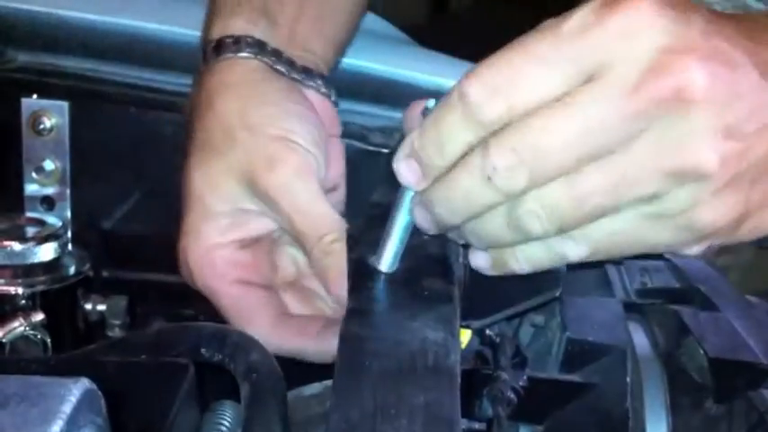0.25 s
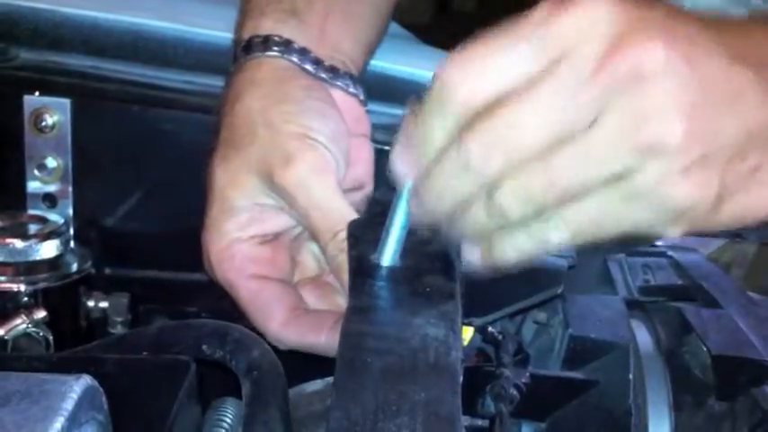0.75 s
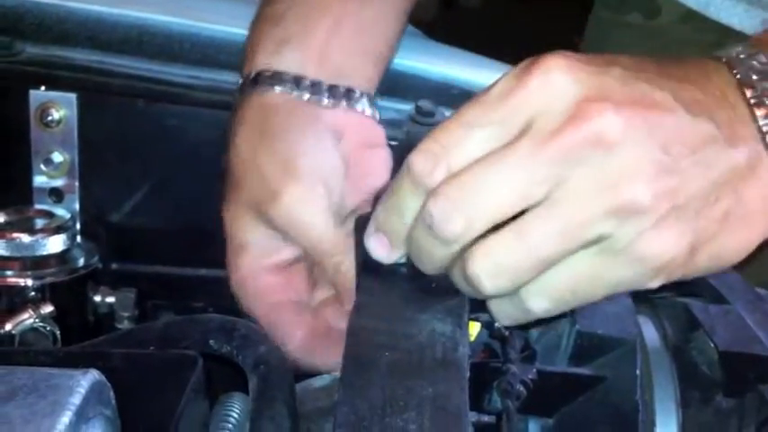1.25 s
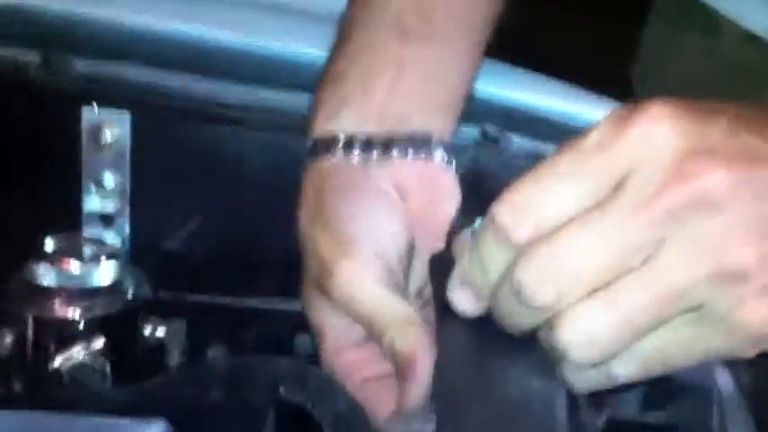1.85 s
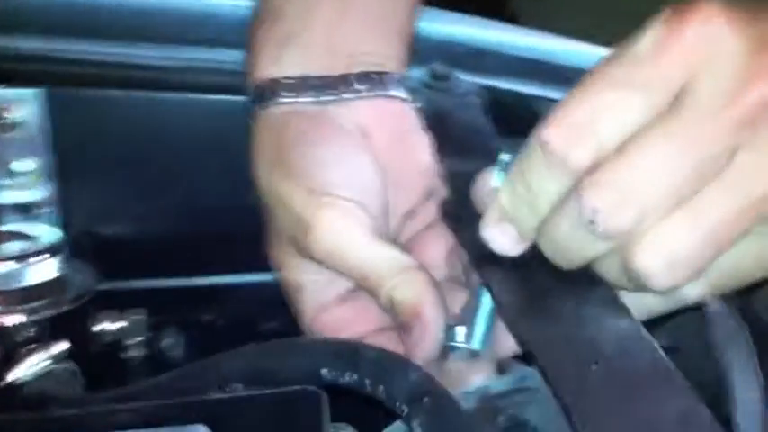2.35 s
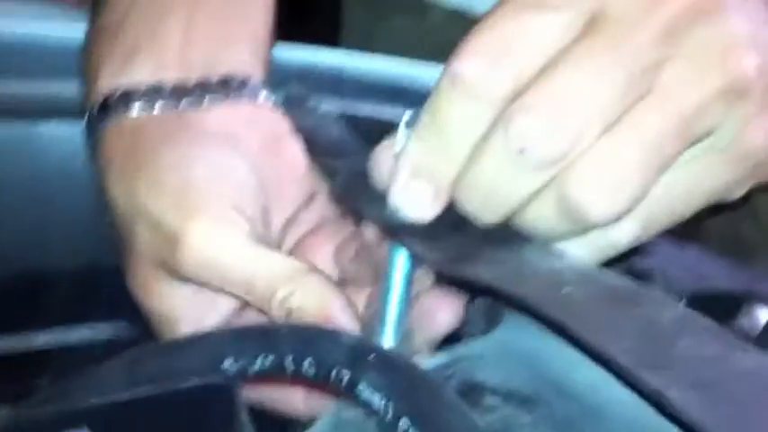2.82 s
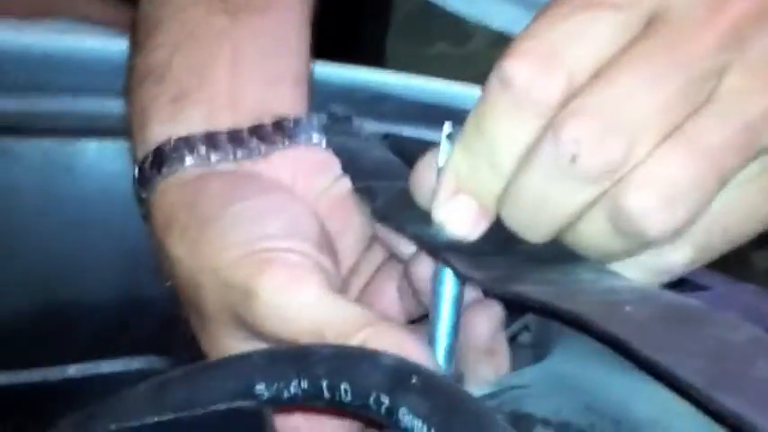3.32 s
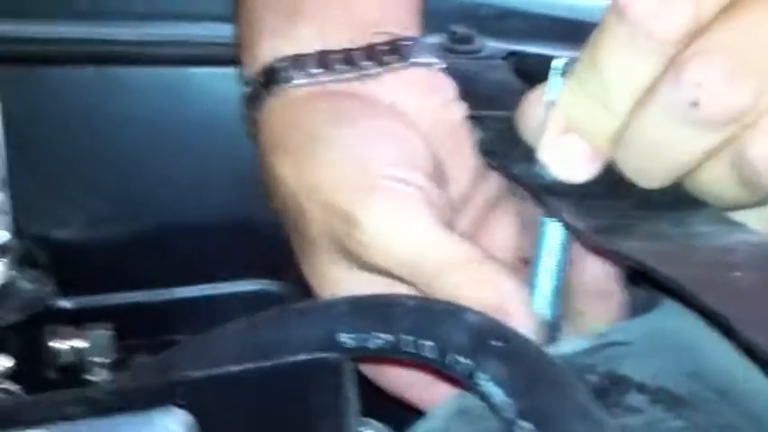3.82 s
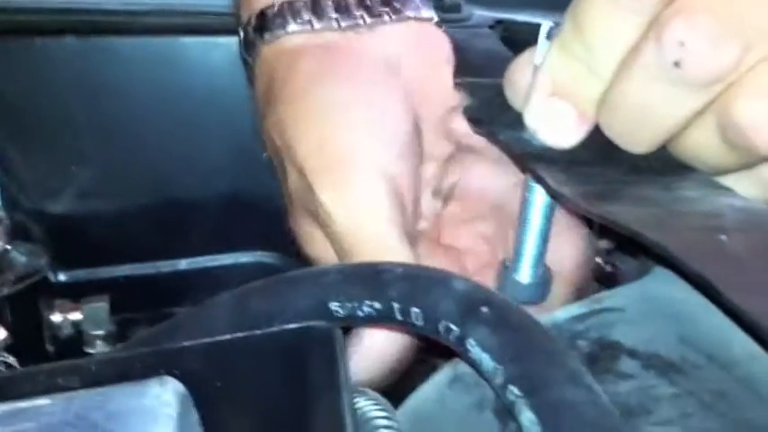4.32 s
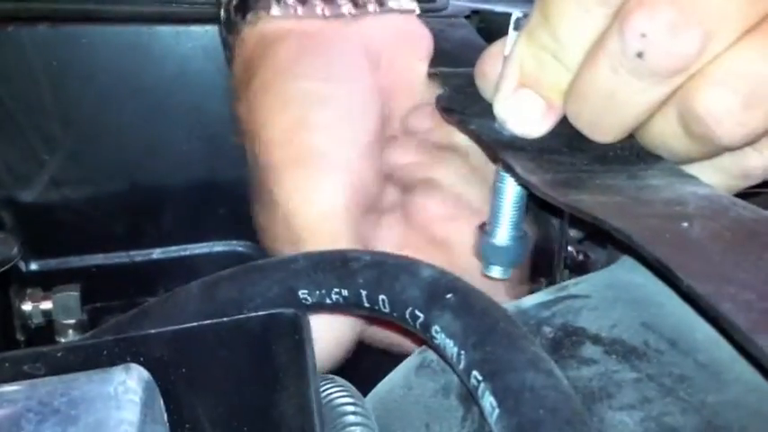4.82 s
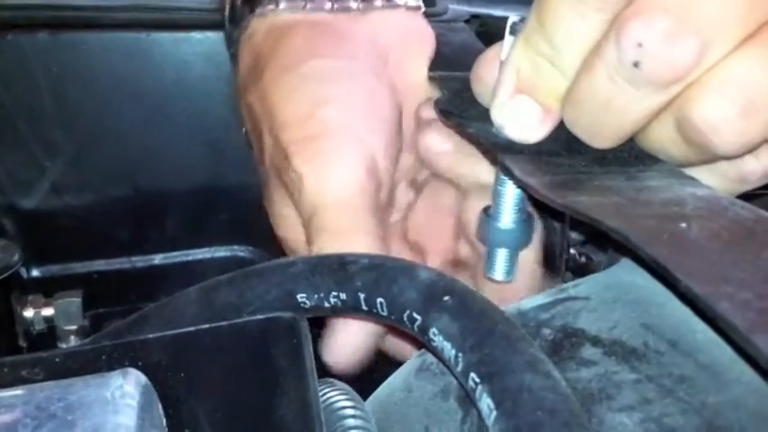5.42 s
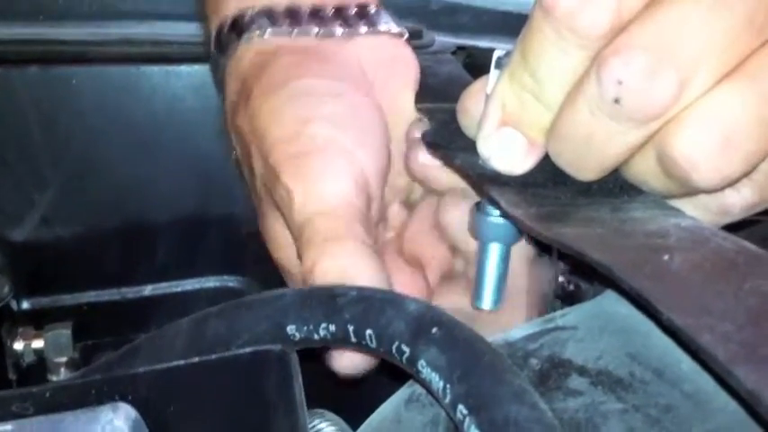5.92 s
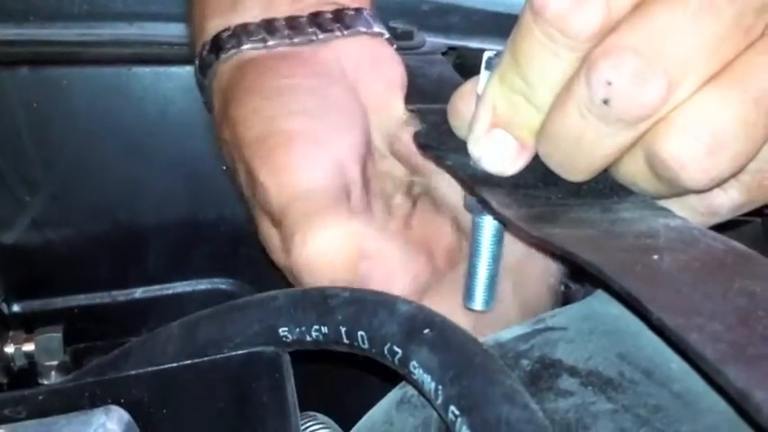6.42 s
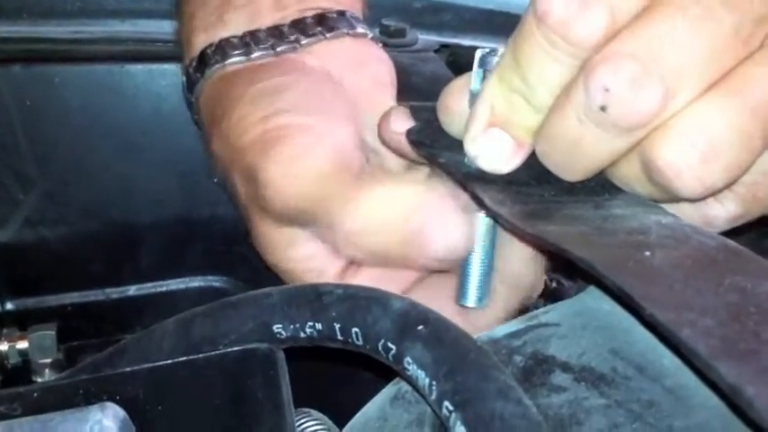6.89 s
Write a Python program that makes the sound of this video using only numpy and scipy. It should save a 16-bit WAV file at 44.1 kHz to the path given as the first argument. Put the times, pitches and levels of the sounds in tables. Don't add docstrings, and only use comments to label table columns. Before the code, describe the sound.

Very close outdoors, a bolt knocks hard into a hole in a steel strap and its thread rasps over the edge in quick gritty ticks. Small taps and rubs follow with quiet gaps, then fingers flick a nut up the thread in a steady series of bright rattling clicks that ring lightly. The engine bay adds short dull scatter; soft air bumps and distant traffic lie beneath.

```python
import sys
import numpy as np
from scipy import signal
from scipy.fft import rfft, irfft
from scipy.io import wavfile
from scipy.ndimage import uniform_filter1d, minimum_filter1d

SR = 44100
rng = np.random.default_rng(int(sys.argv[2]) if len(sys.argv) > 2 else 0)


def store_wav(level_fs):
    pcm = np.round(np.clip(np.atleast_2d(level_fs), -1, 1) * 32767)
    wavfile.write(sys.argv[1], SR, pcm.T.astype(np.int16))


def invert_db(x):
    u = np.asarray(x, float) / 20
    return 10 ** u


N = 315315

SPLITS_HZ = (2000, 7000)



def bolt_in_strap():
    # t/s, peak level/dB, hardness/dB, chatter t60/s, ring f/Hz
    touches = [(0.2815, -54.5, -28, 0.038, 800), (0.5493, -18, -4.5, 0.058, 3400),
               (0.8574, -2, 16, 0.031, 4300), (0.9484, -8.5, 7.5, 0.057, 3030),
               (1.4216, -36, -7, 0.054, 1870), (1.4797, -34, 21, 0.025, 1110),
               (1.531, -42.5, -11.5, 0.033, 2210), (1.574, -47, 15, 0.1, 5000),
               (1.5872, -40.5, 7, 0.1, 5350), (1.6116, -27, 0.5, 0.084, 4380),
               (2.0187, -44, -8, 0.036, 1010), (2.0552, -38, -9, 0.025, 750),
               (2.4137, -51, -15.5, 0.046, 1570), (2.6635, -41.5, -5, 0.063, 1130),
               (3.1293, -38, -0.5, 0.051, 1130), (3.4997, -26, 15, 0.034, 4100),
               (3.5414, -54, 39.5, 0.029, 929)]
    # t/s, peak level/dB, hardness/dB, chatter t60/s, ring f/Hz
    drags = [(0.9015, -6.5, 13, 0.047, 5050), (0.9098, 3.5, 13, 0.021, 2850),
             (0.9364, -24, 18, 0.026, 2700), (0.9565, -6, 14, 0.026, 2840), (1.0625, -56, 3, 0.039, 1200),
             (1.1089, -24.5, -7, 0.053, 1290), (1.1333, 4.5, 22, 0.012, 4560),
             (1.1677, -27, 33, 0.023, 902), (1.1897, -29, 4, 0.075, 2770), (1.2106, -2.5, 7, 0.026, 1200),
             (1.2521, -11.5, 1.5, 0.024, 870), (1.7699, -44, 11, 0.07, 931),
             (1.9085, -29.5, -8, 0.041, 5100), (1.9494, -43, 29, 0.041, 4870), (2.216, -38, 2, 0.082, 6300),
             (2.2494, -36, 25, 0.052, 6300), (2.3494, -48, 20, 0.064, 902), (2.578, -33, 22.5, 0.031, 8000),
             (3.3618, -39, -1, 0.038, 1930), (3.7858, -45, 0, 0.12, 2010)]
    # t of hardest push/s, level/dB, rise of 20 dB/s, fall of 20 dB/s, hardness/dB
    rasp = [
        (0.864, -17, 0.003, 0.04, 15),
        (0.945, -27, 0.3, 0.14, -11),
        (1.115, -31, 0.1, 0.3, -3),
        (1.24, -43, 0.1, 0.08, -13),
        (2.232, -38, 0.055, 0.06, 7),
        (2.58, -41, 0.11, 0.035, 6),
        (3.495, -40, 0.07, 0.025, 20),
        (3.75, -51, 0.04, 0.3, 10),
    ]
    # f/Hz, width/Hz, level above the body colour/dB
    strap_modes = [(904, 60, 7), (1210, 90, 3), (1530, 50, 5), (2240, 30, 4), (2620, 30, 5), (2790, 45, 9),
                   (3310, 110, 6), (3660, 130, 4), (4190, 30, 0), (4600, 70, 3), (5080, 40, 1),
                   (5290, 130, 2), (5850, 40, 5), (6670, 160, 5), (8930, 60, 4), (12700, 220, 4)]
    # f/Hz, level/dB
    strap_body = [(150, -20.5), (250, 2), (816, 4), (906, 6), (1850, 5), (2710, 9), (3120, 7), (5160, 12.5),
                  (7440, -7.5), (14400, 0.5), (16000, -33)]

    knock, knock_ring = chatter(touches, (-0.26, 1.1741, -17.5, 0.88),
                                crest_db=8.0, rise_s=0.0012, ring_db=-1.0, width_hz=260)
    drag, drag_ring = chatter(drags, (-0.5, 1.02, -20.5, 0.9058),
                              crest_db=5.0, rise_s=0.0086, ring_db=9.5, width_hz=490)
    slide = sliding(rasp, (-1.05, 0.3, -15.5, 1.2638), (0.17, 0.81), catch_db=2.0, catch_hz=61.3)
    force = knock + drag + slide * invert_db(-8.5)
    strap = metal(force, strap_modes, strap_body, per_s=6000, spread_db=1.5, wander_db=2.5)
    return knock_ring + drag_ring + strap


def nut_on_thread():
    # t/s, peak level/dB, hardness/dB, chatter t60/s, ring f/Hz
    knocks = [(4.0166, -24, 11.5, 0.054, 5070), (4.1235, -38, -14.5, 0.064, 2027),
              (4.1569, -28, 5.5, 0.15, 5620), (4.3934, -18.5, 6, 0.019, 2300), (4.642, -20, 7, 0.029, 6600),
              (4.6564, -28, -24, 0.02, 1080), (4.8889, -31, 15.5, 0.09, 1060),
              (5.1185, -18, 13, 0.025, 1480), (5.157, -43, 16, 0.017, 1360), (5.3315, -23, 7, 0.035, 5000),
              (5.3524, -27.5, -11.5, 0.045, 1110), (5.3865, -27.5, 9.5, 0.15, 3800),
              (5.5897, -23.5, 5, 0.033, 5730), (5.8287, -21, 7, 0.014, 5650),
              (5.8475, -35.5, -1.5, 0.15, 1070), (6.0887, -14.5, 4, 0.016, 6770),
              (6.119, -28.5, 15, 0.074, 5120), (6.3051, -25, 3.32, 0.021, 1950),
              (6.6747, -41.5, -3, 0.074, 2170), (6.799, -47.5, 14, 0.057, 9000)]
    # t/s, peak level/dB, hardness/dB, chatter t60/s, ring f/Hz
    wobbles = [(4.143, -25.5, 5, 0.045, 5340), (4.4152, -23.5, 0.5, 0.051, 4080),
               (4.434, -22, 6, 0.037, 5530), (4.5555, -33, -3, 0.055, 1610), (4.6164, -35, 11, 0.043, 4000),
               (4.6822, -15.5, 4, 0.028, 4240), (4.907, -25, -4, 0.083, 2560), (5.4251, -33, 1, 0.17, 2610),
               (5.5164, -41, 2, 0.34, 1330), (5.6186, -22.5, 5.5, 0.12, 1670),
               (5.7663, -43, 15, 0.03, 1950), (5.916, -26.5, 7.5, 0.093, 4070),
               (6.0541, -45, 17.5, 0.0145, 1900), (6.1404, -14, 4, 0.022, 2070),
               (6.2114, -18, 1, 0.025, 1960), (6.2484, -49, 2, 0.024, 1960), (6.336, -22.5, 5, 0.062, 6730),
               (6.385, -13, 8.5, 0.018, 5170), (6.99, -54, 12, 0.29, 1690)]
    # t of the flick/s, level/dB, rise of 20 dB/s, fall of 20 dB/s, hardness/dB
    spin = [(4.15, -47, 0.02, 0.55, 8), (4.4, -41.5, 0.003, 0.36, 12), (4.655, -35, 0.004, 0.43, 11),
            (4.91, -42.5, 0.012, 0.155, 8), (5.128, -37, 0.004, 0.15, 3), (5.39, -41.5, 0.08, 1.5, -2),
            (5.603, -39, 0.004, 0.6, -4), (5.849, -38.5, 0.003, 0.9, 4), (6.119, -33, 0.003, 0.4, 1),
            (6.384, -33, 0.09, 0.022, 3), (6.85, -61, 0.8, 1.2, 14), (7.026, -54, 0.15, 0.21, 4)]
    # f/Hz, width/Hz, level above the body colour/dB
    nut_modes = [(760, 50, -2), (1060, 45, 2), (1400, 50, 3), (1670, 55, 5), (1960, 90, 3), (2260, 30, 4),
                 (2650, 50, 5), (3380, 50, 5), (4020, 120, 7), (4960, 60, 7), (5350, 80, 6), (6020, 50, 3),
                 (6770, 90, 8), (7830, 50, 4), (9160, 300, 4), (11900, 70, 5)]
    # f/Hz, level/dB
    nut_body = [(90, -37), (290, -4.5), (500, -10.5), (800, 3.5), (1510, 3), (1980, 4), (2890, 1),
                (3980, -1), (4660, 1), (6900, -4), (7530, -4.5), (16000, -12.5)]
    # t/s, ring level/dB
    freeing = [
        (4.0, -2),
        (5.3, 0),
        (5.7, 3),
        (6.4, 4),
        (6.5, -3),
    ]

    knock, knock_ring = chatter(knocks, (1.1, 0.7472, -12, 1.03),
                                crest_db=9.0, rise_s=0.0018, ring_db=0.5, width_hz=240)
    wobble, wobble_ring = chatter(wobbles, (-3, 1, -14, 1.31),
                                  crest_db=8.5, rise_s=0.004, ring_db=3.0, width_hz=240)
    slide = sliding(spin, (-2.5, 0.15, -27, 2.02), (0.24, 0.7), catch_db=2.5, catch_hz=60.5)
    force = (knock + wobble + slide * invert_db(-7.0)) * hanging()
    free_db = np.interp(np.arange(N) / SR, *np.transpose(freeing))
    nut = metal(force, nut_modes, nut_body, per_s=4500, spread_db=3.5, wander_db=2.0, free_db=free_db)
    return knock_ring + wobble_ring + nut


def hanging():
    # t/s, level lost/dB
    stalls = [
        (5.585, 0),
        (5.822, -1),
        (5.843, 7),
        (6.11, 0.5),
        (6.296, 9),
        (6.33, -1),
    ]
    stall_s = 0.0095
    t = np.arange(N) / SR
    return invert_db(-sum(db * np.exp(-((t - s) / stall_s) ** 2) for s, db in stalls))


def ringing_spots():
    # t/s, peak level/dB, ring f/Hz, t60/s
    bolt_rings = [(0.550, -18, 5050, 0.045), (0.556, -29, 3050, 0.088), (0.552, -14.5, 1170, 0.064),
                  (0.283, -36, 1200, 0.053), (0.907, -26.5, 2720, 0.036), (0.938, -9.5, 3680, 0.043),
                  (0.959, -24, 2747, 0.029), (0.959, -5.5, 4660, 0.032), (0.912, -16, 1070, 0.18),
                  (0.99, -22.5, 1050, 0.22), (1.120, -21, 3140, 0.05), (1.204, -16, 1110, 0.09),
                  (1.423, -31, 1530, 0.069), (1.423, -49, 3470, 0.055), (1.588, -32, 5080, 0.059),
                  (1.613, -31, 4160, 0.085), (1.62, -25.5, 1700, 0.08), (1.66, -46, 4900, .08),
                  (1.908, -40, 5240, 0.14), (1.915, -45, 9100, .04), (2.415, -58, 1550, .08),
                  (2.58, -46, 1590, 0.099), (3.13, -38.5, 1120, 0.1), (3.49, -32.5, 1700, 0.095)]
    # t/s, peak level/dB, ring f/Hz, t60/s
    nut_rings = [(4.017, -28.5, 5150, 0.096), (4.017, -35, 1810, 0.069), (4.25, -47, 1970, 0.73),
                 (4.69, -34, 6200, 0.36), (4.75, -41, 1930, 0.44), (4.80, -40.5, 6610, 0.18),
                 (5.119, -27, 1930, 0.044), (5.119, -29, 5350, .06), (5.119, -27, 11800, 0.078),
                 (5.185, -42, 1810, 0.215), (5.592, -36.5, 5630, .05), (5.617, -33, 1950, 0.17),
                 (5.828, -31, 5630, 0.029), (5.895, -34, 1950, 0.37), (5.918, -43, 4100, 0.041),
                 (5.93, -38, 2330, 0.24), (6.12, -33, 6800, .2), (6.12, -38, 5070, .15),
                 (6.2, -39, 6860, 0.235), (6.155, -40, 2010, 0.6), (6.31, -35.5, 1990, 0.26),
                 (6.338, -38, 6600, 0.17), (6.384, -26, 4000, 0.045), (6.678, -56, 2120, 0.077),
                 (6.817, -42.5, 5350, 0.067), (6.848, -41, 1710, 0.075), (6.958, -37.5, 1570, 0.059),
                 (6.99, -45, 5200, 0.052), (7.015, -41, 2100, 0.13), (7.052, -42, 1780, 0.3)]
    # t/s, peak level/dB, centre f/Hz, t60/s
    rubs = [(0.549, -16.5, 5200, 0.061), (0.57, -46, 3180, 0.15), (0.985, -26.5, 4170, 0.17),
            (1.11, -47, 7400, 0.086), (1.21, -27, 7500, 0.049), (3.26, -47, 4000, .08),
            (3.362, -46, 3500, 0.088), (3.47, -36, 2420, 0.18), (5.387, -21, 4500, 0.065),
            (5.591, -26, 5500, 0.043), (5.607, -36, 2500, .15), (0.937, -4, 4200, .04),
            (1.087, -36, 3020, 0.12), (1.422, -35.5, 2630, 0.079), (1.586, -39, 5200, .06),
            (1.77, -47, 5000, 0.086), (2.02, -41, 2500, 0.064), (0.787, -46, 12000, .02),
            (2.345, -51, 6030, 0.14), (2.414, -41.5, 2200, .1), (2.525, -48, 4600, 0.22),
            (2.555, -43.5, 2200, 0.26), (2.665, -52, 3500, .08), (3.13, -45, 2780, 0.092),
            (4.50, -53, 5000, .1), (5.20, -49, 5000, .05), (5.687, -46.5, 6000, .06),
            (5.848, -36, 1200, 0.16), (6.306, -44, 3200, 0.042), (6.815, -39, 1800, .04),
            (6.845, -48, 2400, 0.1), (6.95, -49, 4550, 0.12), (6.99, -47, 1770, 0.5),
            (7.05, -54, 2000, 0.24), (7.06, -44.5, 5500, 0.13)]
    # t/s, peak level/dB, ring f/Hz, t60/s
    hums = [(0.93, -46, 380, 0.29), (1.02, -26.5, 373, 0.19), (1.11, -36, 380, 0.44), (1.2, -28, 370, 0.19),
            (1.3, -40.5, 356, 0.47), (2.04, -38, 660, 0.069), (2.425, -38, 248, 0.14),
            (2.47, -30.5, 434, 0.11), (4.42, -42, 342, 0.2), (4.76, -39, 385, 0.3), (5.6, -41, 330, .2)]

    rings = free_rings(bolt_rings, width_hz=240, rise_s=0.00028)
    rings += free_rings(nut_rings, width_hz=560, rise_s=0.0012)
    rings += free_rings(rubs, width_hz=2900, rise_s=0.0028)
    rings += free_rings(hums, width_hz=120, rise_s=0.0042)
    return crest_ticks() + rings + snaps()


def crest_ticks():
    # t/s, peak level/dB, ring t60/s
    ticks = [(0.8527, -27, 0.03), (0.9894, -33, 0.03), (1.0034, -35, 0.03), (1.0141, -32, 0.03),
             (1.0274, -40, 0.03), (1.036, -37, 0.03), (1.063, -52, 0.027), (1.0839, -43, 0.03),
             (1.0954, -42, 0.025), (1.1094, -22, 0.027), (1.1214, -23, 0.021), (1.1343, -13.5, 0.027),
             (1.1707, -28.5, 0.026), (1.2036, -19, 0.031), (1.2133, -21, 0.025), (1.2234, -27, 0.03),
             (1.2454, -39, 0.03), (1.2521, -25, 0.025), (1.7699, -57, 0.03), (1.7838, -47, 0.03)]
    mode_hz, spread, level_db = 5200, 0.025, -1.0
    out, t = np.zeros(N + SR), np.arange(SR // 20) / SR
    for s, peak_db, t60 in ticks:
        hz = mode_hz * (1 + spread * rng.standard_normal())
        envelope = (1 - np.exp(-t / 0.00094)) * invert_db(peak_db + level_db - 60 * t / t60)
        out[round(s * SR):][:len(t)] += np.sin(2 * np.pi * hz * t) * envelope
    return out[:N]


def snaps():
    # t/s, peak level/dB
    cracks = [(1.422, -27), (1.533, -34), (1.612, -17), (2.414, -43), (2.664, -39), (3.131, -40),
              (4.02, -30), (4.642, -22), (4.657, -24), (4.891, -30), (5.12, -16), (5.332, -18),
              (5.592, -22), (5.691, -32), (5.767, -26), (5.848, -20), (5.918, -20), (6.117, -20),
              (6.253, -31), (6.307, -29), (6.675, -29), (7.016, -34)]
    level_db, centre_hz, t60_s = -10.5, 2300, 0.024
    rows = [(s, db + level_db, centre_hz, t60_s) for s, db in cracks]
    return free_rings(rows, width_hz=3200, rise_s=0.00018)


def free_rings(rows, width_hz, rise_s):
    out, t = np.zeros(N + SR), np.arange(SR // 4) / SR
    for s, peak_db, hz, t60 in rows:
        rub = resonance(rng.standard_normal(len(t)), hz, width_hz)
        rub = rms_one(resonance(rub, hz, width_hz))
        envelope = (1 - np.exp(-t / rise_s)) * invert_db(peak_db - 6 - 60 * t / t60)
        out[round(s * SR):][:len(t)] += rub * envelope
    return out[:N]


def chatter(events, law, crest_db, rise_s, ring_db, width_hz):
    force, rings = np.zeros((3, N)), np.zeros(N)
    t = np.arange(SR // 8) / SR
    lows_late = 1 - np.exp(-t / 0.0064)
    for s, peak_db, hardness_db, t60, hz in events:
        dull_db, bright_db = shares(hardness_db, law)
        span = slice(round(s * SR), round(s * SR) + len(t))
        shape = (1 - np.exp(-(t / rise_s) ** 2)) * invert_db(peak_db - crest_db - 60 * t / t60)
        force[0, span] += shape * invert_db(dull_db) * lows_late
        force[1, span] += shape
        force[2, span] += shape * invert_db(bright_db)
        strength = invert_db(ring_db + dull_db * (hz < SPLITS_HZ[0])) * np.sqrt(SR / (np.pi * width_hz))
        ring = resonance(shape * rng.standard_normal(len(t)), hz, width_hz)
        rings[span] += strength * softened(ring, hz)
    return force, rings


def sliding(strokes, law, slowing, catch_db, catch_hz):
    force, t = np.zeros((3, N)), np.arange(N) / SR
    pushes = [-1] + [row[0] for row in strokes] + [N / SR + 1]
    for (s, level_db, rise_s, fall_s, hardness_db), start, stop in zip(strokes, pushes, pushes[2:]):
        drop_db = 20 * np.maximum((s - t) / rise_s, (t - s) / fall_s)
        slowed_db = np.minimum(drop_db, 40)
        dull_db, bright_db = shares(hardness_db, law)
        between_pushes = np.clip(np.minimum(t - start, stop - t) / 0.0029, 0, 1)
        push = between_pushes * invert_db(level_db - drop_db)
        force[0] += push * invert_db(dull_db + slowing[0] * slowed_db)
        force[1] += push
        force[2] += push * invert_db(bright_db - slowing[1] * slowed_db)
    return force * invert_db(catch_db * drift(catch_hz))


def shares(hardness_db, law):
    return law[0] - law[1] * hardness_db, law[2] + law[3] * hardness_db


def metal(force, modes, spectrum, per_s, spread_db, wander_db, free_db=0):
    contacts, other_contacts = grains(per_s, spread_db), grains(per_s, spread_db)
    click = coloured(np.r_[1, np.zeros(SR // 10)], spectrum)
    drive, out = [], np.zeros(N)
    edges = [(SPLITS_HZ[0], "low"), (SPLITS_HZ, "band"), (SPLITS_HZ[1], "high")]
    for part_force, (edge_hz, kind) in zip(force, edges):
        part = signal.sosfilt(signal.butter(3, edge_hz, kind, fs=SR, output="sos"), click)
        drive.append(part_force / np.sqrt(np.sum(part ** 2)))
        out += signal.fftconvolve(drive[-1] * contacts, part)[:N]

    freedom = invert_db(1.5 * wander_db * drift(14))
    body_hz, body_db = np.transpose(spectrum)
    for hz, width_hz, above_db in modes:
        mode_freedom = np.roll(freedom, rng.integers(N)) * invert_db(free_db * (hz > 1800))
        strikes = drive[np.searchsorted(SPLITS_HZ, hz)] * other_contacts * mode_freedom
        mode_db = np.interp(np.log(hz), np.log(body_hz), body_db) + above_db - 2
        out += invert_db(mode_db) * softened(resonance(strikes, hz, 1.5 * width_hz), hz)
    return out


def grains(per_s, spread_db):
    sizes = invert_db(spread_db * np.minimum(rng.exponential(1, N), 4)) * rng.choice([-1, 1], N)
    return rms_one(sizes * (rng.random(N) < per_s / SR))


def resonance(x, hz, width_hz):
    r, w = np.exp(-np.pi * width_hz / SR), 2 * np.pi * hz / SR
    return signal.lfilter([(1 - r * r) / 2, 0, (r * r - 1) / 2], [1, -2 * r * np.cos(w), r * r], x + 1e-18)


def softened(x, hz):
    return signal.lfilter(*signal.butter(1, min(2.5 * hz, 0.45 * SR), fs=SR), x)


def coloured(x, spectrum):
    size = 4096
    hz = np.maximum(np.arange(size // 2 + 1) * SR / size, 1)
    point_hz, point_db = np.transpose(spectrum)
    level_db = np.maximum(np.interp(np.log(hz), np.log(point_hz), point_db), -90)
    cepstrum = irfft(np.log(invert_db(level_db)))
    cepstrum[1:size // 2] *= 2
    cepstrum[size // 2 + 1:] = 0
    return signal.fftconvolve(x, irfft(np.exp(rfft(cepstrum))))[:len(x)]


def drift(rate_hz):
    r = np.exp(-2 * np.pi * rate_hz / SR)
    slow = signal.lfilter([1], [1, -2 * r, r * r], rng.standard_normal(N + SR))[SR:]
    return rms_one(slow - slow.mean())


def rms_one(x):
    return x / np.sqrt(np.mean(x ** 2) + 1e-20)


def engine_bay(x):
    t60_s, level_db, cut_hz = 0.2, -8, 670
    t = np.arange(SR // 4) / SR
    tail = rng.standard_normal(len(t)) * invert_db(-60 * t / t60_s) * np.clip(t / 0.0057, 0, 1)
    tail = signal.sosfilt(signal.butter(1, cut_hz, fs=SR, output="sos"), tail)
    return invert_db(level_db) * signal.fftconvolve(x, tail / np.sqrt(np.sum(tail ** 2)))[:N]


def wind_bumps():
    # t/s, peak level/dB, f/Hz, t60/s
    eddies = [(0.125, -44, 172, 0.038), (0.166, -50, 188, 0.081), (0.188, -46, 142, 0.12),
              (0.209, -42, 159, 0.0163), (0.221, -40, 155, 0.1), (0.243, -31.5, 172, 0.0097),
              (0.371, -30.5, 168, 0.08), (0.386, -26, 199, 0.036), (0.4, -22.5, 286, 0.032),
              (0.408, -32, 168, 0.048), (2.038, -37, 176, 0.033), (2.251, -47, 129, 0.068),
              (2.454, -42, 178, 0.078), (2.478, -28, 231, 0.022), (2.494, -35.5, 169, 0.037),
              (2.67, -51, 219, 0.05), (2.866, -38, 165, 0.027), (2.969, -51, 124, 0.074),
              (3.002, -45, 172, 0.072), (3.028, -47, 136, 0.048), (3.045, -47, 166, 0.051),
              (3.084, -49.5, 149, 0.064), (4.048, -53, 141, 0.12)]
    puff_cut_hz, port_cut_hz = 770, 81
    out, t = np.zeros(N + SR), np.arange(SR // 4) / SR
    for s, peak_db, hz, t60 in eddies:
        turns = hz * (t + 0.00019 * (1 - np.exp(-t / 0.00035)))
        puff = rms_one(resonance(rng.standard_normal(len(t)), hz=420, width_hz=600))
        swing = np.sin(2 * np.pi * turns) + invert_db(-17.0) * puff
        envelope = invert_db(peak_db + 12.0 - 60 * t / t60) * (1 - np.exp(-t / 0.00075))
        out[round(s * SR):][:len(t)] += envelope * swing
    dull = signal.sosfilt(signal.butter(4, puff_cut_hz, fs=SR, output="sos"), out[:N])
    return signal.sosfilt(signal.butter(2, port_cut_hz, "high", fs=SR, output="sos"), dull)


def outdoors():
    # f/Hz, level/dB
    air = [(250, -26.5), (400, -2.5), (800, -0.5), (1200, -2), (2000, -4.5), (2600, -10.5), (4000, -11.5),
           (6300, -13.5), (10000, -20), (13000, -25.5), (15600, -25), (16500, -10)]
    # t/s, rumble level/dB
    gust = [(0.0, -56.5), (0.32, -51), (0.72, -54), (1.1, -55), (1.71, -58.5), (2.63, -55), (3.62, -60.5),
            (4.86, -57.5), (6.0, -55), (6.6, -58), (7.15, -55.5)]
    # f/Hz, level/dB
    rumble_colour = [(12, -96), (20, -55), (90, -8), (123, 0), (206, -1), (300, -4.5), (387, -1.5),
                     (425, -14), (500, -13.5), (650, -16), (1100, -120)]
    # t/s, level/dB, fade of 10 dB either side/s
    rustle = [
        (2.93, -66, 0.3),
        (3.5, -72, 3),
        (6.9, -70, 1.5),
    ]

    t = np.arange(N) / SR
    traffic = invert_db(-54.5 + 0.8 * drift(2.2)) * rms_one(coloured(rng.standard_normal(N), air))
    rumble_db = np.interp(t, *np.transpose(gust)) + 1.6 * drift(12)
    rumble = invert_db(rumble_db) * rms_one(coloured(rng.standard_normal(N), rumble_colour))
    hiss = signal.butter(2, [8000, 15000], "band", fs=SR, output="sos")
    leaves = rms_one(signal.sosfilt(hiss, rng.standard_normal(N)))
    stirring = sum(invert_db(db - 10 * abs(t - s) / fade_s) for s, db, fade_s in rustle)
    return traffic + rumble + stirring * leaves


def scene():
    hands = bolt_in_strap() + nut_on_thread()
    mix = hands + engine_bay(hands) + wind_bumps() + outdoors() + ringing_spots()
    return mix[None]


def hush_before_attacks(x, ahead_s, jump_db, depth_db):
    treble = signal.sosfiltfilt(signal.butter(2, 1800, "high", fs=SR, output="sos"), x)
    level_db = 10 * np.log10(uniform_filter1d(treble ** 2, size=88) + 1e-12)
    ahead = int(ahead_s * SR)
    coming_db = -minimum_filter1d(-level_db, size=ahead, origin=-(ahead // 2))
    hush = uniform_filter1d(np.clip((coming_db - level_db - jump_db) / 4, 0, 1), size=44)
    return x - treble * (1 - invert_db(-depth_db * hush))


def starve_treble(x, from_hz, loud_db, share):
    hz, _, cells = signal.stft(x[0], SR, nperseg=512)
    level_db = 10 * np.log10(np.sum(abs(cells[hz > 600]) ** 2, axis=0) + 1e-12)
    luck = rng.standard_normal((len(hz) // 3 + 1, cells.shape[1]))
    luck = rms_one(uniform_filter1d(luck, size=12))
    luck = np.repeat(luck, 3, axis=0)[:len(hz)]
    high = np.clip((hz[:, None] - from_hz) / 4000, 0, 1)
    loud = np.clip((level_db - loud_db) / 8, 0, 1)
    emptied = (luck > 3 - share * high * loud) & (hz[:, None] < 15000)
    return signal.istft(cells * np.where(emptied, 0.05, 1), SR, nperseg=512)[1][None, :N]


def top_cut(x):
    return signal.sosfilt(signal.butter(12, 16980, fs=SR, output="sos"), x)


def record(dry):
    hushed = hush_before_attacks(dry, ahead_s=0.012, jump_db=17, depth_db=14)
    starved = starve_treble(hushed, from_hz=8500, loud_db=-52, share=2.8)
    mix = signal.sosfilt(signal.cheby2(18, 50, 16050, fs=SR, output="sos"), starved)
    return top_cut(mix)


dry = scene()
out = record(dry)
store_wav(out)
```